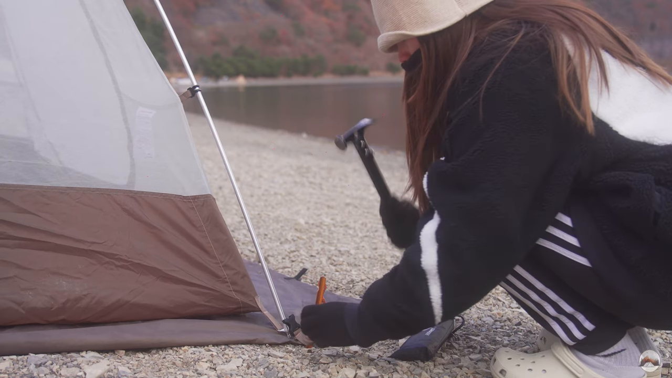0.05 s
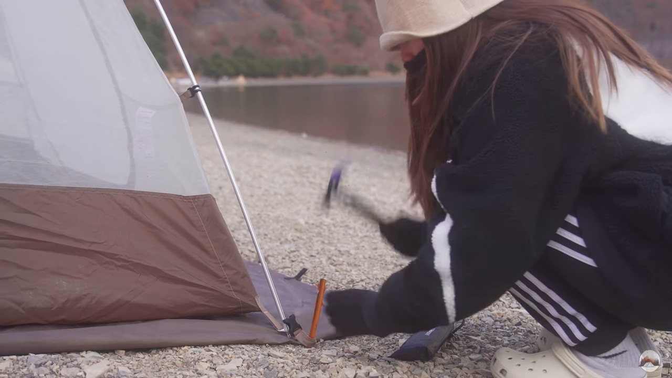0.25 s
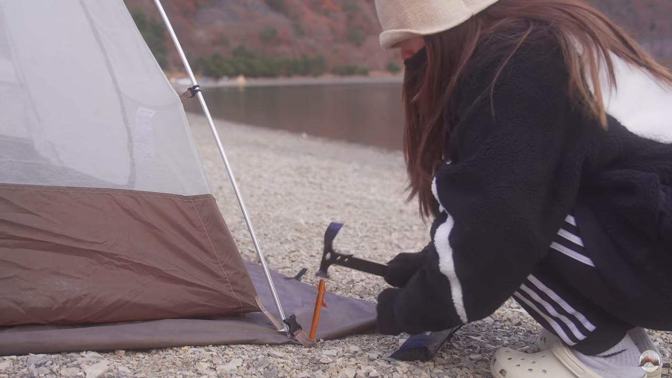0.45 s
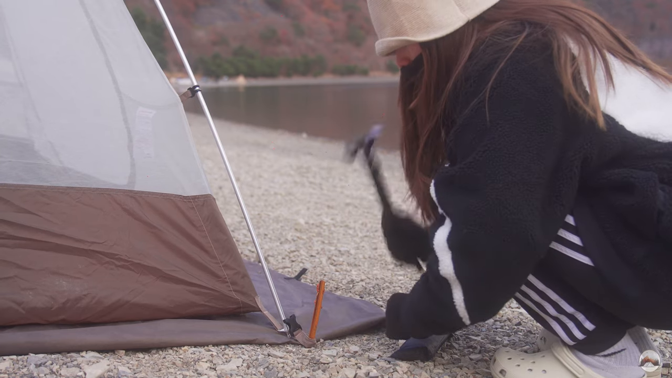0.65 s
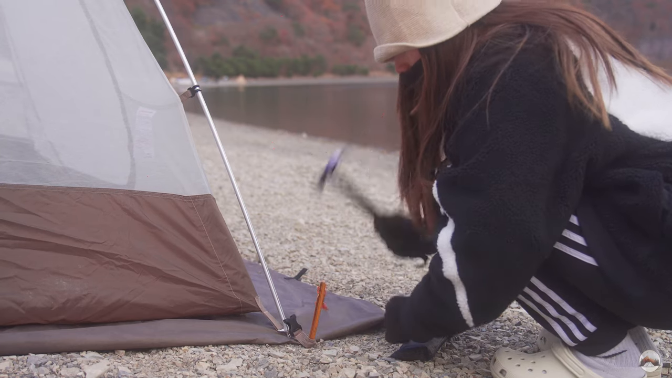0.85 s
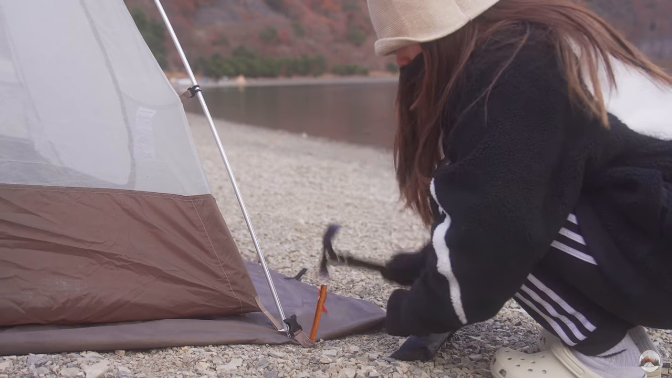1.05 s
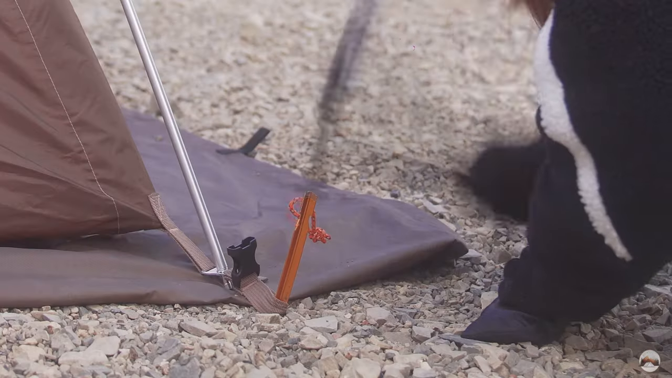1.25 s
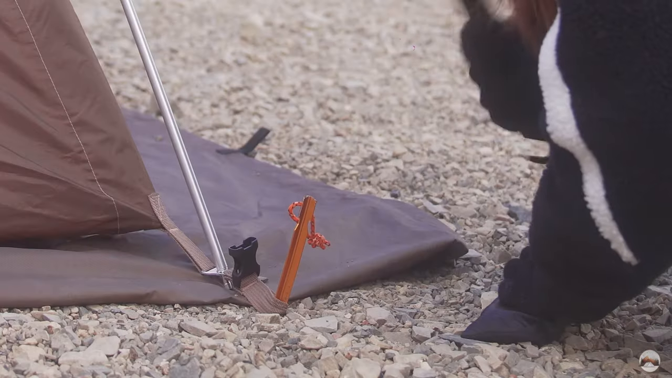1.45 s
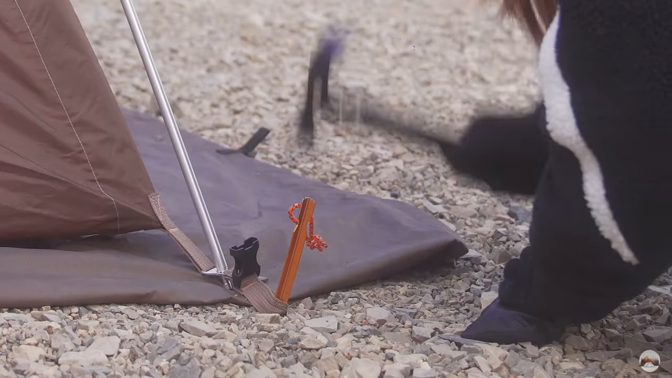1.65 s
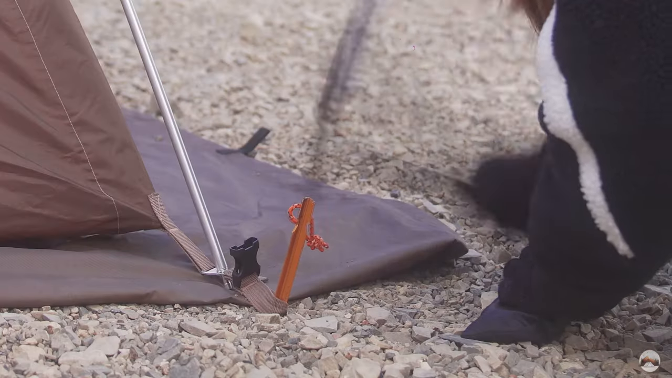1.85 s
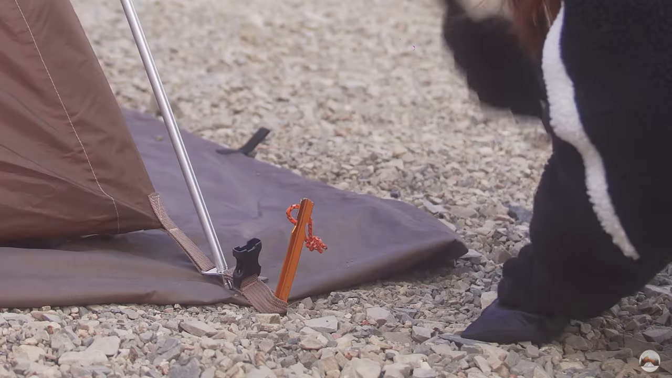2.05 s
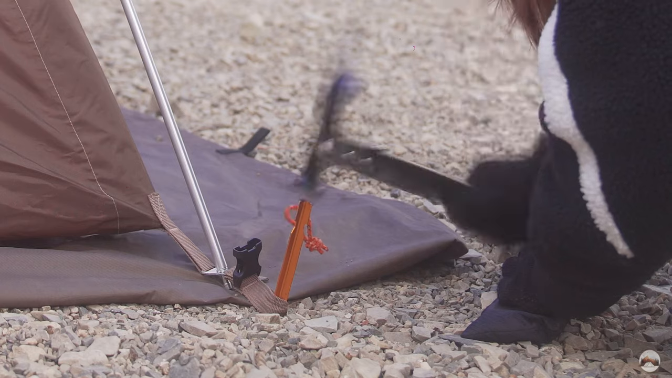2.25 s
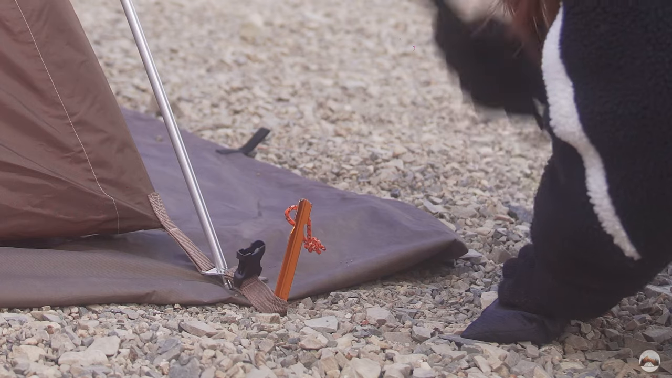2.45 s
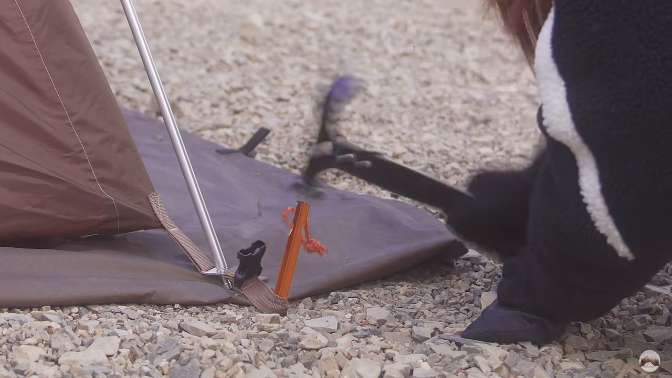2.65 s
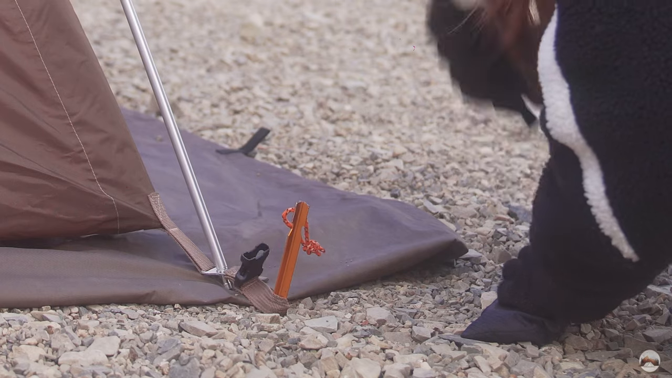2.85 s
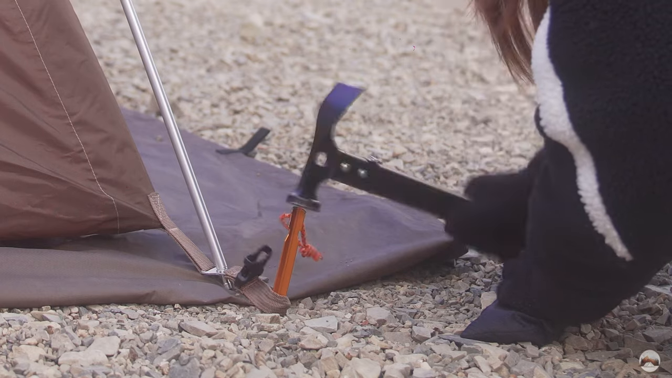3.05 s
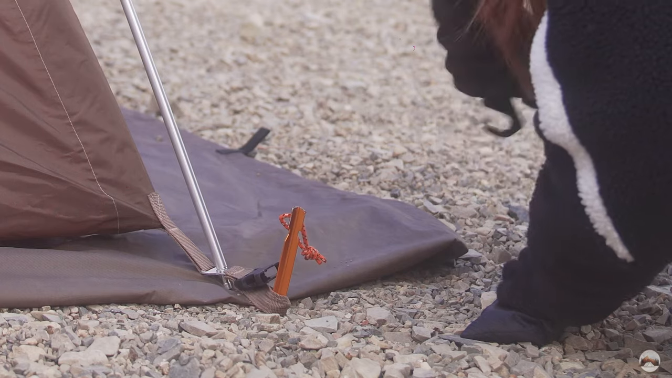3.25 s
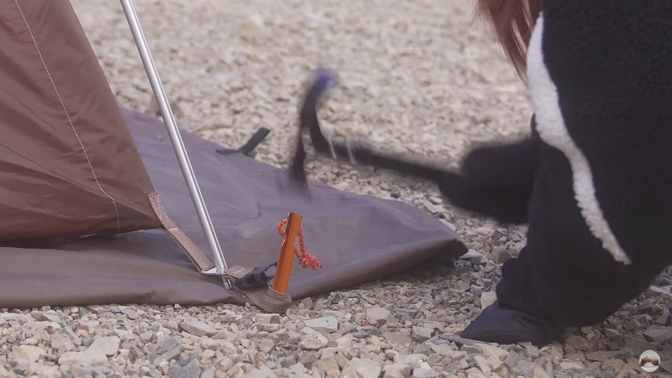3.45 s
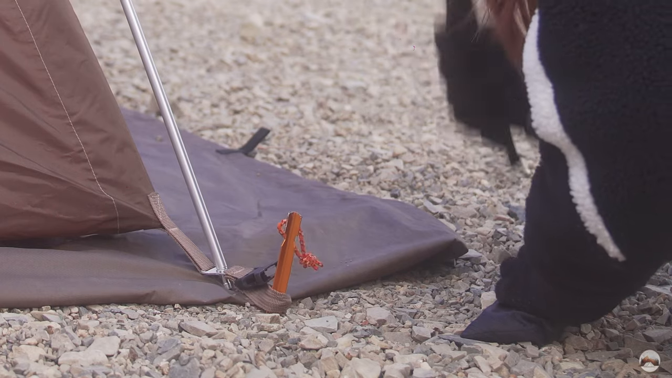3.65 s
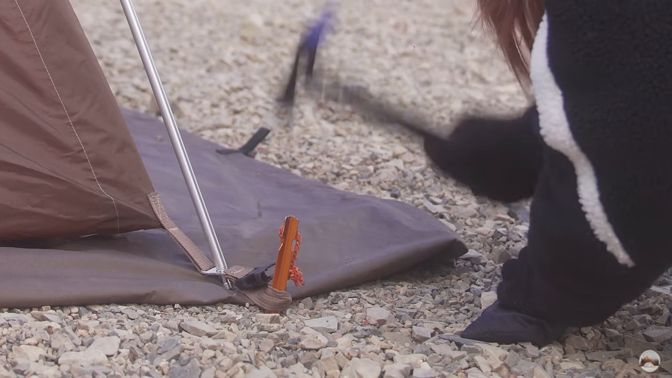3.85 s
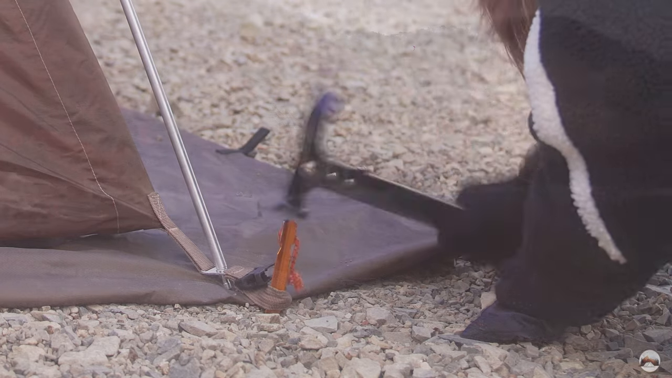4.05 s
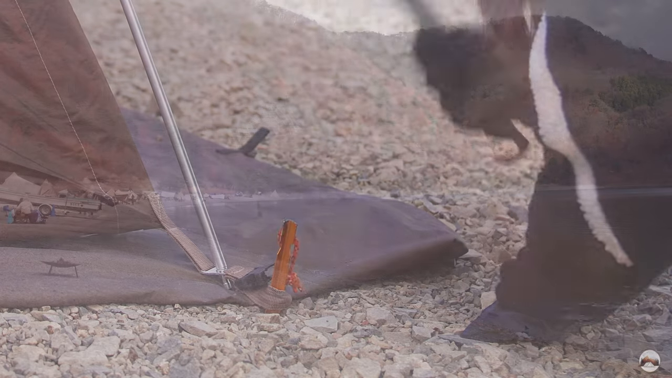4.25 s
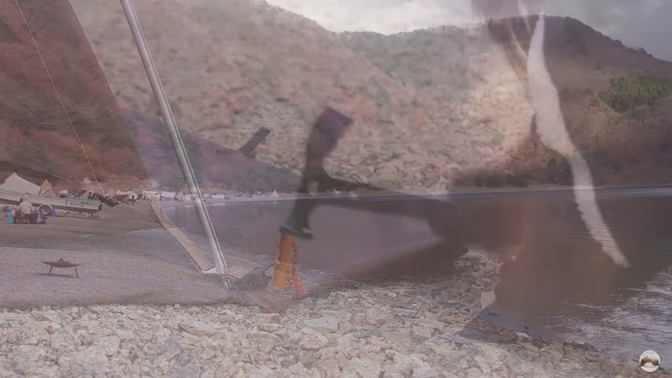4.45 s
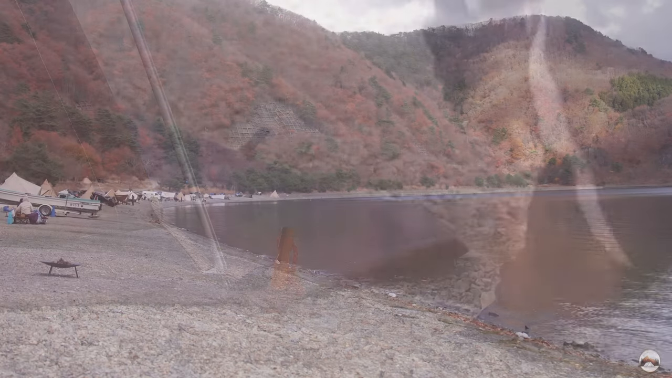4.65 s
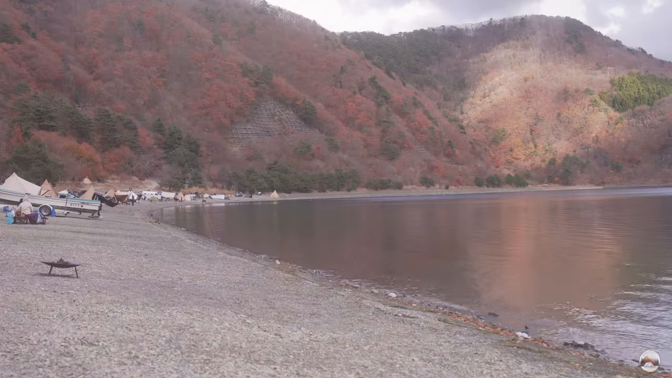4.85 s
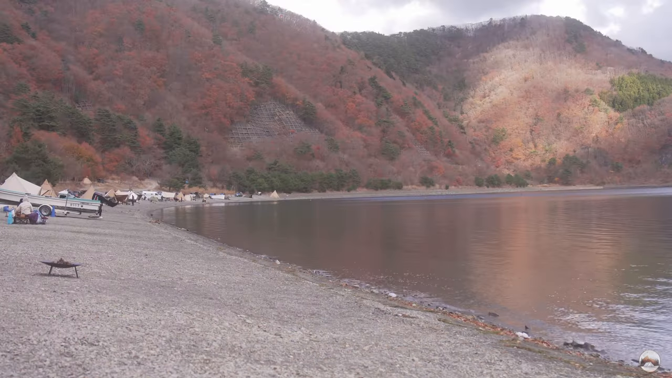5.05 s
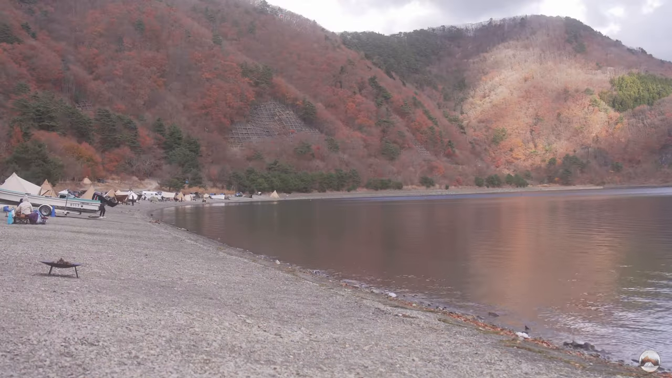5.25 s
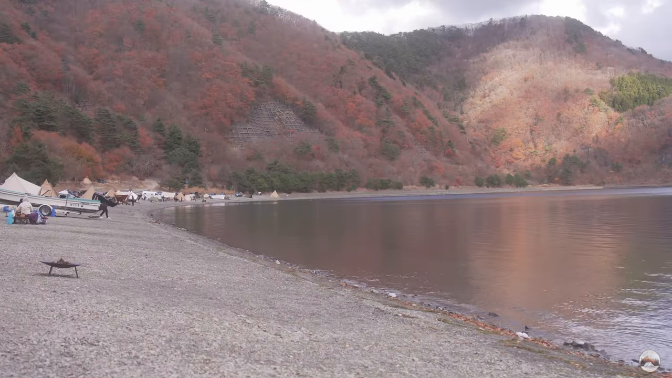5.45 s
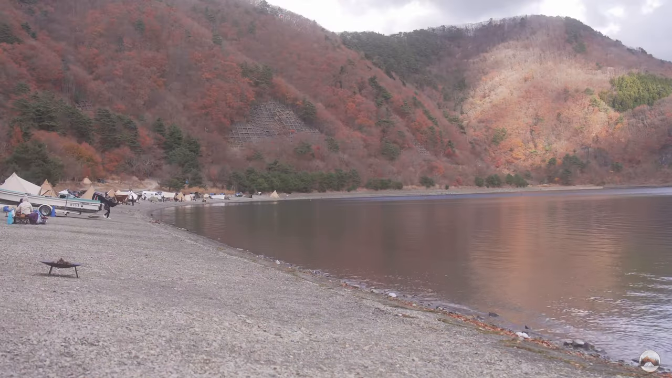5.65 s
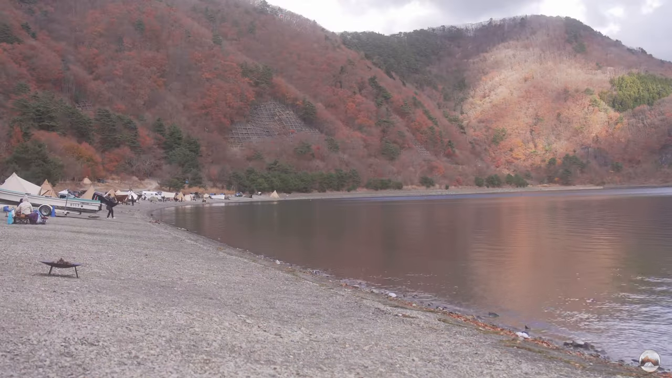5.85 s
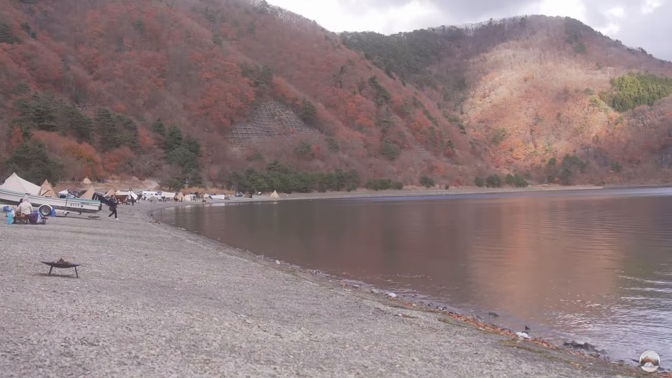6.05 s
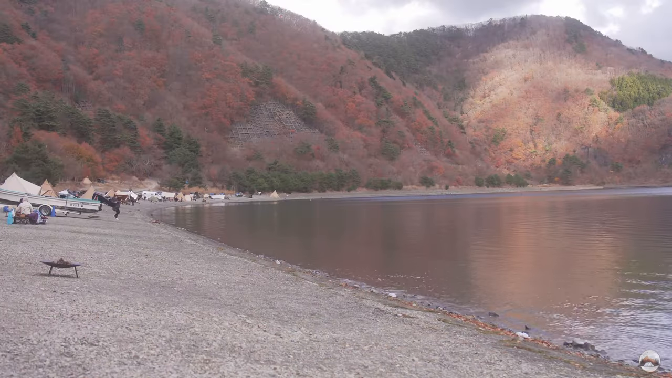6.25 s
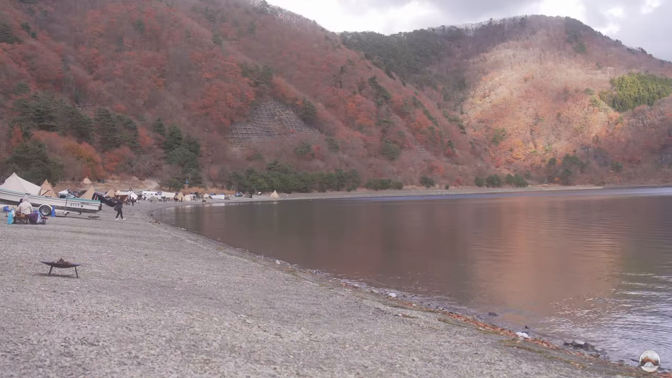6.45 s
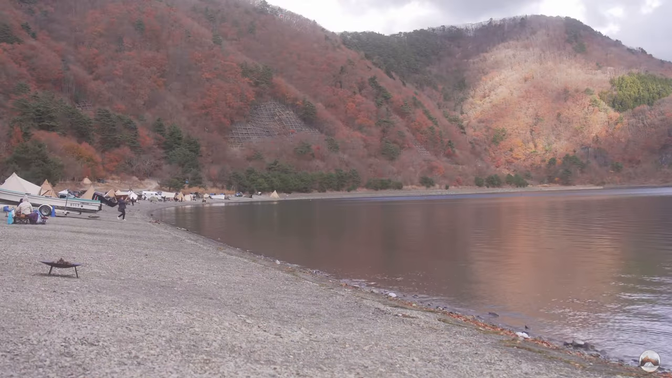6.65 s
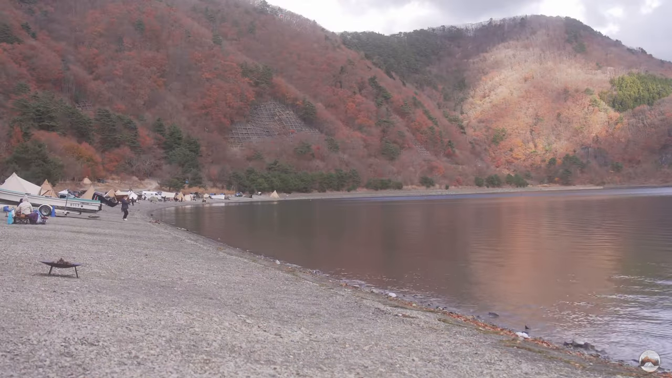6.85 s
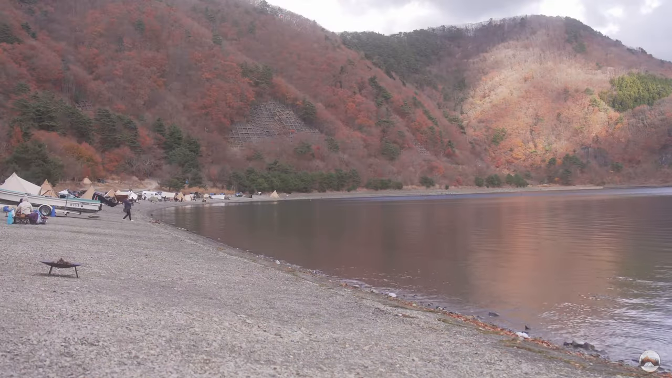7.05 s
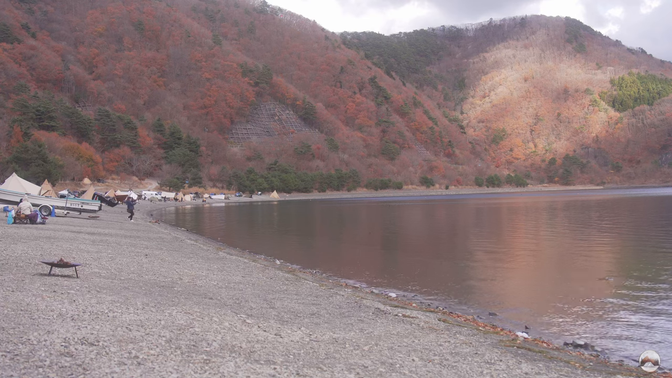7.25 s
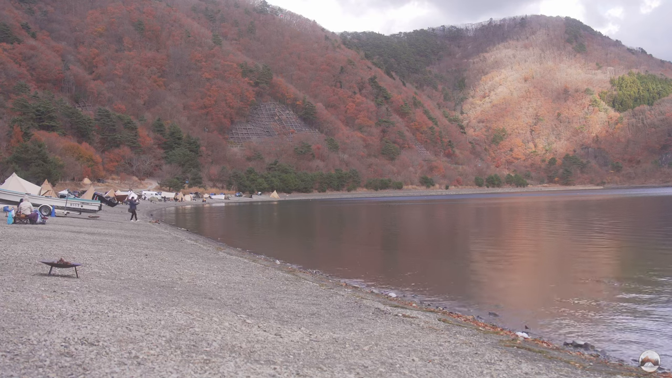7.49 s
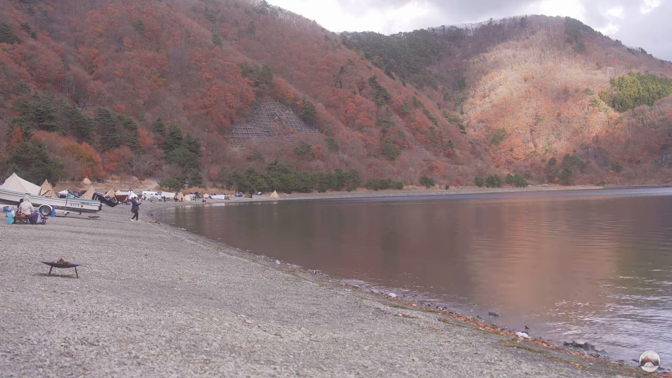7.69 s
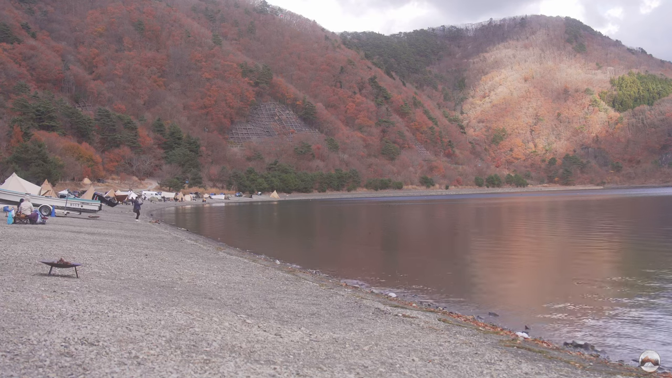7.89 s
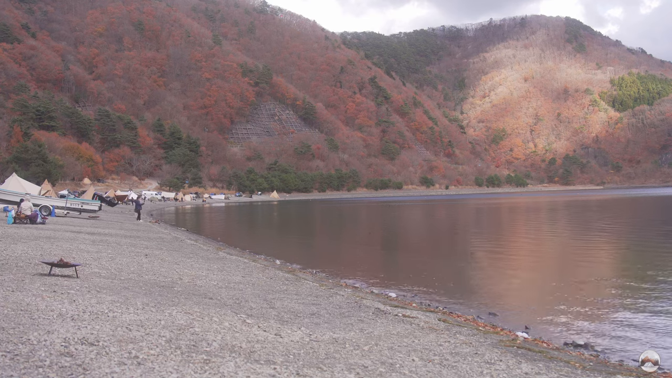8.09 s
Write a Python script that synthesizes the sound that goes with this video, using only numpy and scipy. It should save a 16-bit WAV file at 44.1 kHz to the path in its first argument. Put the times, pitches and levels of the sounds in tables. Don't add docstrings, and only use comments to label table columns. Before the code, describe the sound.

Close, hard metallic clinks repeat evenly from start to finish as a peg is hammered into gravel. Early blows are knockier and looser; later ones vary in brightness and ring. Quick, weaker rebounds follow each hit. Behind them lie very quiet air and water wash, a faint distant engine, two early caws, soft waterbird hoots, and a sleeve scrape with gravel ticks around five seconds. Open-air microphone, loud peaks, quiet background.

```python
import sys
import numpy as np
from scipy import signal
from scipy.io import wavfile

SR = 44100
rng = np.random.default_rng(int(sys.argv[2]) if len(sys.argv) > 2 else 0)


def store_pcm(level_fs):
    pcm = np.round(np.clip(level_fs, -1, 1) * 32767).astype(np.int16)
    wavfile.write(sys.argv[1], SR, np.atleast_2d(pcm).T)


def volts(x):
    e = np.asarray(x, float) / 20
    return 10 ** e


N = 358091
TIME = np.arange(N) / SR

# start_s, rumble_db, wash_db
AIR_LEVELS = [(0.0, -59.5, -60.5), (1.15, -60, -70.5), (1.38, -58, -71.5), (3.71, -57, -68),
              (4.43, -52.5, -65.5), (4.88, -52, -52.5), (5.83, -56, -65.5), (7.28, -57, -66),
              (7.8, -56.5, -63), (8.12, -56, -57.5)]
# freq_hz, density_db_per_hz
RUMBLE_SPECTRUM = [(15, -55.5), (25, -23), (54, -19), (134, -2.5), (184, -4.5), (248, -0.5), (445, -10.5),
                   (708, -23), (900, -15), (1170, -43.5), (1980, -120)]
# freq_hz, density_db_per_hz
WASH_SPECTRUM = [(290, -34), (500, -5), (2120, -14), (2430, -18.5), (2660, -18.5), (4500, -41), (5850, -73),
                 (9900, -120)]
# start_s, level_db
ENGINE_LEVELS = [
    (0, -77),
    (1.2, -66),
    (4.4, -60),
    (5.2, -62),
    (6, -70),
    (8.12, -68),
]
# start_s, level_db
JACKET_LEVELS = [(0, -69), (.45, -72.5), (1.18, -81), (1.3, -73), (1.45, -81), (4.35, -79), (4.66, -56.5),
                 (5.06, -56.5), (5.22, -62), (5.55, -64), (5.95, -77.5), (6.06, -74.5), (6.1, -63.5),
                 (6.5, -64.5), (6.6, -77.5), (7.2, -81.5), (7.87, -72.5), (8.12, -63.5)]
# freq_hz, density_db_per_hz
RUSTLE_SPECTRUM = [(1180, -28), (2000, -3), (2400, -5.5), (2720, -2), (7000, -3), (9100, -33.5),
                   (15400, -120)]
# freq_hz, density_db_per_hz
HISS_SPECTRUM = [(3820, -35.5), (6500, -5.5), (8560, -0.5), (10400, -11), (13800, -11), (15100, -13),
                 (16000, -16)]
# start_s, freq_hz, level_db, rise_s, t60_s
FAR_CLANGS = [(1.519, 2883, -61.5, 0.011, 0.22), (2.088, 2912, -59.5, 0.0103, 0.193),
              (2.1, 4325, -72, 0.0128, 0.31), (2.278, 1440, -61, .004, 0.41),
              (2.278, 2120, -56.5, 0.0043, 0.23), (2.278, 2657, -55.5, 0.0032, 0.27),
              (2.278, 2970, -58, 0.0037, 0.25), (2.278, 3650, -66, .004, .3), (2.28, 4600, -74, .004, 0.41),
              (2.0, 2022, -55.5, 0.015, 0.223), (3.36, 2129, -61, 0.0225, 0.44),
              (3.87, 2092, -62.5, 0.036, 0.49), (4.201, 2115, -61, 0.025, 0.53),
              (7.109, 2075, -62, 0.035, 0.33)]
# start_s, length_s, top_pitch_hz, level_db
CAWS = [
    (0.065, .24, 433.3, -63),
    (.6, 0.2, 437.4, -61.5),
]
CAW_HARMONICS_DB = [-13, 1, 3, -7, -25]
# start_s, length_s, pitch_hz, level_db
HOOTS = [
    (3.55, .1, 650, -63),
    (3.74, .09, 640, -59),
    (4.715, .085, 545, -52),
    (5.7, .08, 655, -62),
]
# start_s, peak_db, pitch_hz
STONES = [(0.0167, -61.5, 6300), (0.082, -49, 1300), (0.3257, -51.5, 7600), (0.6234, -55.5, 7160),
          (0.8908, -60, 3790), (1.004, -60, 8000), (1.158, -60, 7500), (1.418, -58, 3800),
          (1.445, -60, 7800), (6.56, -60, 7000), (6.851, -65, 2500), (3.668, -62, 7500), (4.955, -45, 900),
          (6.686, -52, 600), (1.7201, -56, 7300), (1.8, -59, 12400), (2.0198, -56, 7660),
          (2.4174, -56.5, 6400), (2.4474, -61.5, 8600), (2.8102, -53.5, 5960), (2.8256, -57, 1200),
          (3.521, -43.5, 3440), (3.993, -60, 11570), (4.911, -37.5, 3800), (4.9176, -36.5, 7000),
          (4.9568, -37, 3790), (5.7636, -57, 6480), (5.9525, -60, 7860), (6.1163, -50, 5190),
          (6.586, -61, 3304), (6.6006, -55, 7340), (6.6065, -55.5, 4000), (6.6858, -47.5, 1200),
          (6.7241, -62.5, 3300), (6.7615, -57, 1591), (6.794, -51.5, 1093), (7.2975, -59.5, 3072),
          (7.7702, -52, 7000), (7.9267, -42, 2350)]

# start_s, force_db, lean_low_to_mid_db, high_clank_db, head_ring_db
BLOWS = [(0.2063, -13.5, 18.5, -9.5, -47.0), (0.5123, -15.5, 10.0, -5.5, -36.0),
         (0.7895, -10.5, 9.5, -8.5, -26.5), (1.0713, -14.0, 9.5, -11.0, -33.0),
         (1.3475, -13.0, 7.5, -11.5, -22.0), (1.645, -9.0, -0.5, -4.0, -57.0),
         (1.9477, -14.5, 1.0, -5.5, -33.0), (2.338, -16.5, 4.0, -7.5, -30.0),
         (2.7351, -12.5, -2.5, -4.0, -45.5), (3.107, -12.0, 9.0, -8.0, -25.5),
         (3.45, -5.5, 4.0, 0.5, -20.0), (3.809, -17.5, 18.0, -10.0, -42.5),
         (4.1385, -15.5, 9.5, -10.0, -32.5), (4.4753, -13.0, 5.5, 0.0, -21.0),
         (4.8222, -18.5, 10.0, -4.0, -40.0), (5.1662, -13.5, 19.0, -3.0, -24.5),
         (5.5122, -8.0, 8.5, -2.0, -25.5), (5.847, -10.5, -2.0, -5.0, -27.0),
         (6.1686, -12.0, -12.5, -7.0, -20.0), (6.4901, -11.5, -16.5, -7.5, -31.0),
         (6.879, -6.5, -4.0, -5.0, -17.5), (7.2162, -15.0, 2.0, -11.0, -22.0),
         (7.5375, -13.5, 6.5, -18.0, -24.0), (7.858, -14.5, 4.5, -8.5, -13.0)]
# thump_db, knock_db, dull_clank_db, high_ring_db, crack_db
BLOW_COLOUR = [(2.5, -2.5, -1.5, -2.0, 1.5), (-0.5, 3.5, 0.5, -9.5, 4.5), (2.5, -4.5, 1.5, -19.0, -0.5),
               (0.5, -1.5, -3.0, 1.0, 6.0), (5.5, -1.0, 2.0, 9.5, -2.0), (-6.5, 6.0, 1.0, 4.0, -9.5),
               (2.5, 2.5, 0.5, 2.0, 1.0), (4.0, -2.5, 1.5, -5.0, 1.5), (0.5, -4.0, 1.5, -6.0, -0.5),
               (-2.0, -3.0, -1.5, -3.0, 1.5), (2.5, -2.5, -4.0, -5.0, -8.0), (-4.5, 0.5, 4.5, 0.0, 5.0),
               (0.5, 2.0, 0.0, 8.0, -3.0), (2.5, 4.0, 1.0, -6.0, 4.5), (1.5, 0.5, 0.5, 0.5, 0.0),
               (1.5, 6.0, 3.5, 4.5, 3.0), (3.0, 3.0, 1.0, -21.5, 0.0), (2.5, -5.0, -3.5, -20.5, 3.5),
               (3.0, 1.0, -0.5, -6.5, 1.5), (-2.0, -0.5, -7.5, 7.0, 2.5), (0.5, 1.0, 0.0, -5.5, -2.0),
               (3.0, 2.0, -1.0, -17.5, -0.5), (0.0, -5.5, 1.5, -1.5, -4.5), (3.5, 5.0, -3.0, -23.5, 5.0)]
# knock_lean_db, mid_clank_lean_db, head_ring_t60_s, linger_db, graze_db
BLOW_BALANCE = [(8.5, 3.0, 0.22, -1.0, 2.5), (14.5, 0.5, 0.41, -0.5, 0.5), (9.0, 3.5, 0.46, 2.0, 0.5),
                (11.0, -16.5, 0.28, 1.5, -0.5), (-1.5, 19.0, 0.37, 2.0, 0.5), (-5.5, 1.0, 0.42, 4.0, 5.0),
                (3.5, -13.5, 0.33, 3.0, -3.0), (-11.5, 2.0, 0.28, -4.0, 1.0), (-7.0, 7.0, 0.26, -2.5, 2.0),
                (-1.0, 6.0, 0.25, -1.5, -0.5), (-5.5, -0.5, 0.18, 1.0, -1.0), (-4.0, -6.0, 0.27, 1.5, 1.5),
                (-6.5, 13.0, 0.32, 4.0, -0.5), (-7.0, 12.5, 0.42, 2.0, 6.0), (5.0, 29.0, 0.22, -0.5, 2.5),
                (-11.0, 9.0, 0.26, 1.0, 2.0), (5.0, 0.0, 0.26, 1.0, 6.0), (6.0, -9.5, 0.39, 1.5, 4.5),
                (18.5, 6.0, 0.26, 0.5, 1.0), (12.0, 11.5, 0.32, 2.5, 4.0), (2.0, -5.0, 0.28, -4.0, -2.0),
                (7.5, 0.5, 0.25, -1.5, 0.0), (17.5, 1.5, 0.3, 1.0, -7.5), (-6.0, -6.5, 0.24, -1.0, -3.0)]
# middle_knock_db, low_clank_lean_db
BLOW_ACCENT = [(-33.0, -12.0), (-14.0, -12.0), (-35.5, 3.0), (-22.0, -12.0), (-31.0, 12.0), (-41.0, 12.5),
               (-36.5, 2.5), (-50.0, -1.0), (-47.5, -3.5), (-50.0, 9.0), (-31.5, 15.5), (-30.0, -7.0),
               (-40.0, 0.5), (-50.0, 7.5), (-34.0, -3.0), (-50.0, -1.0), (-34.5, 5.5), (-50.0, 5.5),
               (-25.0, 16.0), (-30.0, 11.5), (-50.0, 7.5), (-34.5, -1.0), (-50.0, -5.5), (-50.0, -11.0)]
# start_s, clank_db, ground_thud_db, head_ring_left_db
REBOUNDS = [(0.235, -31.5, -21.5, -42), (0.552, -36.5, -24, -41), (0.8161, -26, -22.5, -46.5),
            (1.1013, -28, -20, -38), (1.3662, -23.5, -21, -28.5), (1.6711, -18.5, -21.5, -33.5),
            (1.9719, -20, -33.5, -28), (2.3686, -16.5, -31, -28), (2.7616, -17, -28.5, -27),
            (3.1362, -26, -25, -28), (3.4705, -31, -24.5, -27), (3.8343, -31, -23, -34.5),
            (4.1591, -22.5, -25, -28.5), (4.494, -26, -21, -32.5), (4.8425, -19, -21, -24.5),
            (5.1846, -27, -21.5, -35), (5.5352, -23, -21, -32), (5.8664, -26.5, -25, -32),
            (6.1911, -31, -19.5, -26), (6.5103, -25, -22.5, -29.5), (6.9095, -26.5, -18.5, -25),
            (7.2476, -23, -19, -26.5), (7.5655, -20, -18.5, -43.5), (7.878, -27.5, -16.5, -29.5)]
# knock_db, low_clank_db, mid_clank_db, crack_db
REBOUND_COLOUR = [(3.5, -4.0, 3.5, 3.0), (4.0, -8.5, 4.0, 6.0), (4.5, 0.0, 2.5, -2.5),
                  (0.5, -7.0, 4.5, -1.0), (0.0, -11.5, -3.0, 6.5), (0.0, 0.0, -6.0, 3.0),
                  (-3.5, 2.5, -7.5, 1.0), (-6.0, -2.0, -12.5, -2.0), (-2.5, 5.0, -8.0, -0.5),
                  (-3.5, 4.5, -0.5, 4.0), (-3.5, 0.0, 1.5, 6.0), (0.0, -7.5, 0.5, 4.0),
                  (-0.5, 2.5, -8.0, 2.5), (-1.0, -2.5, -5.5, -1.5), (0.5, -3.5, -7.0, 5.0),
                  (-1.5, -4.0, -4.0, 0.5), (-2.5, -5.5, 4.5, 4.0), (-0.5, 2.0, -6.0, 0.0),
                  (0.5, -5.5, -6.0, 12.0), (1.5, 1.5, -9.5, 2.5), (0.5, -1.5, 0.0, 6.5),
                  (2.5, 4.5, -7.0, -0.5), (2.5, 1.5, -4.0, 3.5), (0.0, -4.5, -8.5, 1.5)]
# start_s, clank_db, head_ring_left_db
SECOND_DROPS = [(1.3788, -32.5, -44.5), (1.6834, -34, -43), (1.979, -28.5, -60.5), (2.3769, -31.5, -53),
                (2.7698, -39.5, -56.5), (3.1447, -35.5, -41.5), (3.48, -26, -63), (3.8459, -30.5, -45),
                (4.1684, -33.5, -51.5), (4.5042, -37.5, -51), (4.8515, -33, -37.5), (5.5481, -26.5, -41.5),
                (5.877, -31.5, -52.5), (6.206, -33, -30), (6.5194, -29.5, -39.5), (6.9184, -31.5, -32.5),
                (7.2625, -38, -33.5), (7.5751, -28.5, -43.5), (7.8881, -32, -30), (7.901, -42, -49)]
# start_s, clank_db
TICKS = [(0.254, -40.5), (0.561, -39.5), (0.8388, -39), (1.1206, -41), (1.3856, -35.5), (1.3957, -40),
         (1.6939, -42), (1.9971, -41), (2.784, -38.5), (3.1554, -37.5), (3.4628, -20.5), (3.4991, -34.5),
         (3.857, -38.5), (4.1878, -39.5), (4.5243, -37), (4.8561, -38), (4.8696, -34.5), (4.885, -37),
         (5.2157, -34.5), (5.556, -30), (5.5603, -37.5), (5.8825, -34), (5.8961, -38), (6.2146, -40),
         (6.2182, -36), (0.8295, -40), (7.2665, -40), (2.3875, -42), (6.5402, -42), (6.906, -27.5),
         (6.9284, -37.5), (7.581, -33.5), (7.906, -43)]
# centre_s, level_db
SWELLS = [(0.345, -66), (3.25, -60), (3.33, -67), (5.31, -54), (5.68, -66), (6.33, -60), (6.63, -56),
          (7.06, -66), (7.39, -59)]

# freq_hz, level_db, t60_s
DULL_CLANK = [(2006.3, -7, 0.032), (2230, 2, 0.011)]
# freq_hz, level_db, t60_s
LOW_CLANK = [(2959, -3.5, 0.0098), (3203.8, -2, 0.028)]
# freq_hz, level_db, t60_s
MID_CLANK = [(3861, -12, 0.015), (4400, -12.5, 0.0051), (5197, -5.5, 0.017), (5440, -8.5, 0.0061),
             (6173, -13.5, 0.026), (6620, -7, 0.0056)]
# freq_hz, level_db, t60_s
HIGH_CLANK = [(7000, -3.5, 0.012), (7571, -6.5, 0.014), (7842, -5, 0.015), (8401, -2.5, 0.017),
              (8989, -13.5, 0.021)]
# freq_hz, level_db, t60_s
TOP_CLANK = [(10890, -3.5, 0.012), (12360, -7.5, 0.0081), (14120, -17.5, 0.033)]
# freq_hz, level_db, t60_s
HIGH_RING = [(9510, 0, .065)]
# freq_hz, level_over_head_ring_db, t60_s
LINGER = [(3212.5, -7, .07), (5263, -17, 0.074), (6147, -19, 0.049), (7814, -18.5, 0.074), (8520, -16, .05),
          (9484, -17, 0.078)]
# freq_hz, level_db, t60_s
KNOCK = [(551.8, -3, 0.018), (894, -4, 0.0099), (1290.3, -8.5, 0.018)]
# freq_hz, level_db, t60_s
GROUND = [(148.4, -7.5, 0.091), (261.4, -6, 0.025), (381.5, -2.5, 0.037)]
# low_hz, high_hz, crack_db, crack_t60_s, tail_db, tail_t60_s
DULL_CRUNCH = (1399, 2498.5, -6.5, 0.0253, -30, 0.0954)
# low_hz, high_hz, crack_db, crack_t60_s, tail_db, tail_t60_s
LOW_CRUNCH = (2500, 3699, -6, 0.03, -32, 0.1056)
# low_hz, high_hz, crack_db, crack_t60_s, tail_db, tail_t60_s
MID_CRUNCH = (3701, 6599.5, -3, 0.0128, -31.5, 0.0903)
# low_hz, high_hz, crack_db, crack_t60_s, tail_db, tail_t60_s
HIGH_CRUNCH = (6601, 9799.5, -7.5, 0.0029, -29, 0.0318)
# low_hz, high_hz, crack_db, crack_t60_s, tail_db, tail_t60_s
TOP_CRUNCH = (9799.5, 15799.5, -3.5, 0.0109, -24.5, 0.0535)
# low_hz, high_hz, crack_db, crack_t60_s, tail_db, tail_t60_s
KNOCK_CRUNCH = (450.5, 1497.5, -5, 0.0183, -28, 0.1124)
# low_hz, high_hz, crack_db, crack_t60_s, tail_db, tail_t60_s
GROUND_CRUNCH = (109.5, 450.5, -11, 0.0738, -24.5, 0.0015)


def rms_one(x):
    return x / np.sqrt(np.mean(x ** 2) + 1e-20)


def band(x, low_hz, high_hz):
    sos = signal.butter(2, [low_hz, min(high_hz, .45 * SR)], "band", fs=SR, output="sos")
    return signal.sosfilt(sos, x)


def drift(rate_hz):
    knots_s = np.arange(0, N / SR + 1, 1 / rate_hz)
    return np.interp(TIME, knots_s, rng.standard_normal(len(knots_s)))


def in_time(rows):
    start_s, *columns_db = np.transpose(rows)
    return [volts(np.interp(TIME, start_s, column_db)) for column_db in columns_db]


def clicks(seconds, gains):
    train = np.full(N, 1e-18)
    np.add.at(train, (np.asarray(seconds) * SR).astype(int), gains)
    return train


def ring(train, hz, t60_s):
    radius = volts(-60 / (t60_s * SR))
    angle = 2 * np.pi * hz / SR
    return signal.lfilter([0, np.sin(angle)], [1, -2 * radius * np.cos(angle), radius * radius], train)


def dying(train, t60_s):
    return signal.lfilter([1], [1, -volts(-60 / (t60_s * SR))], train)


def coloured_noise(spectrum, patchy_db):
    hz, db = np.transpose(spectrum)
    white = rng.standard_normal((2, N))
    edges_hz = np.geomspace(hz[0], hz[-1], int(3 * np.log(hz[-1] / hz[0])) + 2)
    out = 0
    for k, (low_hz, high_hz) in enumerate(zip(edges_hz, edges_hz[1:])):
        level_db = np.interp(np.log(low_hz * high_hz) / 2, np.log(hz), db)
        flicker = volts(level_db + patchy_db * drift(11))
        out = out + flicker * band(white[k % 2], low_hz, high_hz)
    return rms_one(out)


def struck(seconds, level_db, modes, crunch=None, spread_db=2.5, contact_s=0.00054, lean_db=0):
    luck = rng.standard_normal((len(seconds), len(modes)))
    push = np.hanning(int(contact_s * SR) + 3)
    push_s = np.arange(len(push)) / SR
    out = 0
    for k, (hz, db, t60_s) in enumerate(modes):
        tilt_db = lean_db * (k / len(modes) - .5)
        gain = volts(level_db + db + spread_db * luck[:, k] + tilt_db)
        train = clicks(seconds, gain * np.cos(np.pi * k))
        swelling = push * np.cos(2 * np.pi * hz * push_s) * 2 / push.sum()
        out = out + ring(np.convolve(train, swelling)[:N], hz, t60_s)
    if crunch is None:
        return out
    low_hz, high_hz, crack_db, crack_t60_s, tail_db, tail_t60_s = crunch
    train = np.convolve(clicks(seconds, volts(level_db)), push / push.sum())[:N]
    envelope = volts(crack_db) * dying(train, crack_t60_s) + volts(tail_db) * dying(train, tail_t60_s)
    return out + rms_one(band(rng.standard_normal(N), low_hz, high_hz)) * envelope


def rumble_and_wash():
    rumble, wash = in_time(AIR_LEVELS)
    far = rumble * coloured_noise(RUMBLE_SPECTRUM, patchy_db=2.5)
    return far + wash * coloured_noise(WASH_SPECTRUM, patchy_db=1.1449)


def engine_drone():
    centre_hz, width_hz = 250, 35
    hum = band(rng.standard_normal(N), centre_hz - width_hz / 2, centre_hz + width_hz / 2)
    return in_time(ENGINE_LEVELS)[0] * rms_one(hum)


def far_clangs():
    out = 0
    for start_s, hz, db, rise_s, t60_s in FAR_CLANGS:
        age_s = np.maximum(TIME - start_s, 0)
        envelope = (1 - np.exp(-age_s / rise_s)) * volts(db - 60 * age_s / t60_s + 4.5 * drift(80))
        out = out + envelope * np.sin(2 * np.pi * hz * TIME + hz / 1500 * drift(110))
    return out


def crow():
    scoop, scoop_s, sag = .12, .021, .17
    attack_s, release_s, fade_db_per_s = .029, .04, 13
    out = 0
    for start_s, length_s, top_hz, db in CAWS:
        age_s = np.clip(TIME - start_s, 0, length_s)
        hz = top_hz * (1 - scoop * np.exp(-age_s / scoop_s) - sag * (age_s / length_s) ** 2)
        phase = 2 * np.pi * np.cumsum(hz * (1 + 0.0037 * drift(80))) / SR
        voice = sum(volts(h) * np.sin((k + 1) * phase) for k, h in enumerate(CAW_HARMONICS_DB))
        opening = np.clip(np.minimum(age_s / attack_s, (length_s - age_s) / release_s), 0, 1)
        out = out + voice * opening * volts(db - fade_db_per_s * age_s + 1.445 * drift(40))
    return out


def waterbird():
    edge_s, scoop = .02, .06
    out = 0
    for start_s, length_s, pitch_hz, db in HOOTS:
        age_s = np.clip(TIME - start_s, 0, length_s)
        hz = pitch_hz * (1 - scoop * np.exp(-age_s / edge_s))
        opening = np.clip(np.minimum(age_s, length_s - age_s) / edge_s, 0, 1)
        out = out + volts(db) * opening * np.sin(2 * np.pi * np.cumsum(hz) / SR)
    return out


def jacket():
    scrape, = in_time(JACKET_LEVELS)
    hiss = volts(-72.5) * (scrape / volts(-70)) ** .85
    grain = volts(1.6 * drift(110) + 1.5 * drift(25))
    rustle = scrape * coloured_noise(RUSTLE_SPECTRUM, patchy_db=3.0)
    return grain * (rustle + hiss * coloured_noise(HISS_SPECTRUM, patchy_db=2.5))


def stones():
    spread_ratio, t60_s = 1.6, .014
    out = np.zeros(N)
    age_s = np.arange(600) / SR
    for start_s, db, hz in STONES:
        puff = rng.standard_normal(len(age_s)) * volts(-60 * age_s / t60_s)
        tick = band(puff, hz / spread_ratio, hz * spread_ratio)
        first = int(start_s * SR)
        out[first:first + len(age_s)] += volts(db + 6) * tick / np.abs(tick).max()
    return out


def after_touches():
    rows = [row[:3] for row in REBOUNDS]
    rows += [(s, db, db + 4) for s, db, _ in SECOND_DROPS]
    rows += [(s, db, db - 13) for s, db in TICKS]
    rows += [(blow[0] + .0131, balance[-1] - 33.5, -49) for blow, balance in zip(BLOWS, BLOW_BALANCE)]
    return np.transpose(rows)


def both(blow, touch):
    return np.concatenate([blow, touch])


def contact_times():
    return both(np.transpose(BLOWS)[0], after_touches()[0]) - .0004


def looseness():
    return np.exp(-np.transpose(BLOWS)[0] / 1.2)


def rebound_over():
    spare = len(after_touches()[0]) - len(REBOUND_COLOUR)
    return np.pad(np.transpose(REBOUND_COLOUR), [(0, 0), (0, spare)])


def ground_thump():
    high_db, thump_over_db = np.transpose(BLOWS)[3], np.transpose(BLOW_COLOUR)[0]
    thump_db = -18.5 - .2 * (high_db - high_db.mean()) + thump_over_db
    level_db = both(thump_db, after_touches()[2] - 6.5)
    return struck(contact_times() + 0.001, level_db, GROUND, GROUND_CRUNCH, contact_s=.003)


def peg_knock():
    start_s, knock_over_db = np.transpose(BLOWS)[0], np.transpose(BLOW_COLOUR)[1]
    bump_db = after_touches()[2]
    level_db = both(-21 + 12 * looseness() + knock_over_db, bump_db - 2.0 + rebound_over()[0])
    lean_db = both(np.transpose(BLOW_BALANCE)[0], 0 * bump_db)
    knock = struck(contact_times(), level_db, KNOCK, KNOCK_CRUNCH, contact_s=0.0013, lean_db=lean_db)
    middle_train = clicks(start_s + .0006, volts(np.transpose(BLOW_ACCENT)[0]))
    return knock + ring(middle_train, hz=905, t60_s=.02)


def clank():
    start_s, force_db, lean_db, high_db, _ = np.transpose(BLOWS)
    _, _, dull_over_db, ring_over_db, crack_over_db = np.transpose(BLOW_COLOUR)
    _, clank_db, bump_db = after_touches()
    _, low_over_db, mid_over_db, top_over_db = rebound_over()
    seconds, between_db, level = contact_times(), (clank_db + bump_db) / 2, 0 * clank_db

    stone_db = 10 * np.exp(-((start_s - 1.8) / .19) ** 4)
    dull_db = -17 - 8.5 * looseness() - .15 * lean_db + stone_db + dull_over_db
    out = struck(seconds, both(dull_db, between_db - 7.5), DULL_CLANK, DULL_CRUNCH, contact_s=0.0026)

    low_db = both(force_db - lean_db / 2, between_db - 6.0 + low_over_db)
    low_lean_db = both(np.transpose(BLOW_ACCENT)[1], level)
    out += struck(seconds, low_db, LOW_CLANK, LOW_CRUNCH, contact_s=0.00075, lean_db=low_lean_db)

    mid_db = both(force_db + lean_db / 2, clank_db - 9.0 + mid_over_db)
    mid_lean_db = both(np.transpose(BLOW_BALANCE)[1], level)
    out += struck(seconds, mid_db, MID_CLANK, MID_CRUNCH, spread_db=4.5, contact_s=0.0004,
                  lean_db=mid_lean_db)

    out += struck(seconds, both(high_db, clank_db - 3.0), HIGH_CLANK, HIGH_CRUNCH, spread_db=3.0,
                  contact_s=0.0005)
    top_db = both(force_db - 5 + crack_over_db, clank_db - 14.5 + top_over_db)
    out += struck(seconds, top_db, TOP_CLANK, TOP_CRUNCH, contact_s=0.00018)
    return out + struck(start_s, -19 + 1.9 * high_db + ring_over_db, HIGH_RING, spread_db=-0.5)


def lingering_modes():
    start_s, ring_db = np.transpose([(row[0], row[-1]) for row in BLOWS + REBOUNDS])
    linger_db = np.transpose(BLOW_BALANCE)[3]
    return struck(start_s, ring_db + both(linger_db, linger_db), LINGER, spread_db=3.5)


def head_ring():
    ring_hz, steepening_db_per_s2, swell_span_s = 2576, 230, .04
    touches = [(0, -47.5)] + [(row[0], row[-1]) for row in BLOWS + REBOUNDS + SECOND_DROPS]
    touch_s, level_db = np.transpose(sorted(touches))
    last = np.searchsorted(touch_s, TIME, side="right") - 1
    age_s = TIME - touch_s[last]
    blow = np.searchsorted(np.array(BLOWS)[:, 0], TIME, side="right") - 1
    t60_s = np.array(BLOW_BALANCE)[np.maximum(blow, 0), 2]
    loss_db = 60 * age_s / t60_s + steepening_db_per_s2 * age_s ** 2
    height = volts(level_db[last] - loss_db + 1.2 * drift(30))
    smooth_height = signal.lfilter([.04], [1, -.96], height)
    swell = sum(volts(db) * np.exp(-((TIME - s) / swell_span_s) ** 2) for s, db in SWELLS)
    phase = 2 * np.pi * ring_hz * TIME
    return smooth_height * np.sin(phase) + swell * np.cos(phase)


def hammer():
    return ground_thump() + peg_knock() + clank() + lingering_modes() + head_ring()


def scene():
    background = rumble_and_wash() + engine_drone() + far_clangs() + crow() + waterbird()
    return (background + jacket() + stones() + hammer())[None]


def roll_off(x):
    return signal.sosfilt(signal.butter(12, 15800, fs=SR, output="sos"), x)


def record(dry):
    bass_cut = signal.butter(2, 95, "high", fs=SR, output="sos")
    cut = signal.sosfilt(bass_cut, signal.sosfilt(bass_cut, dry))
    circuit = volts(-78) * rms_one(band(rng.standard_normal(N), 18, 57))
    return roll_off(np.clip(cut + circuit, -1.05, 1.05))


dry = scene()
out = record(dry)
store_pcm(out)
```